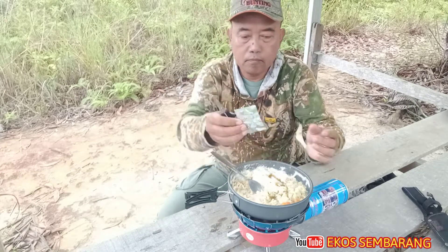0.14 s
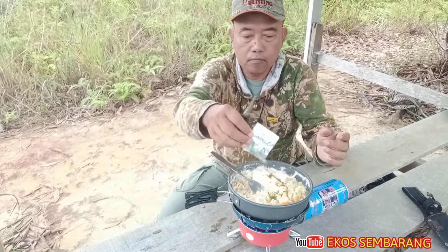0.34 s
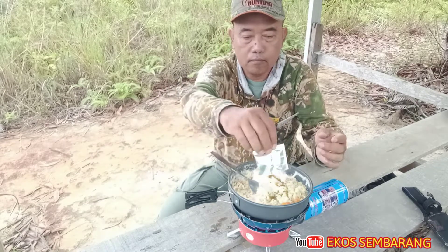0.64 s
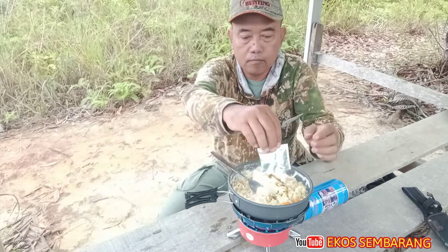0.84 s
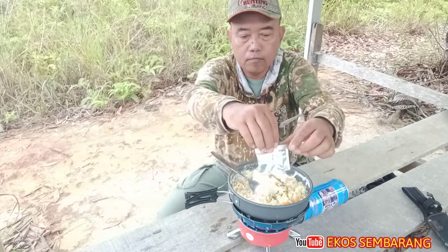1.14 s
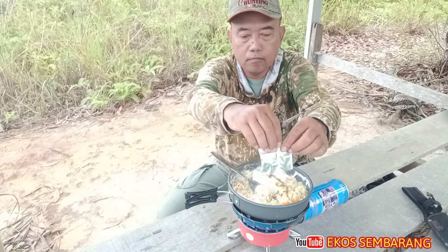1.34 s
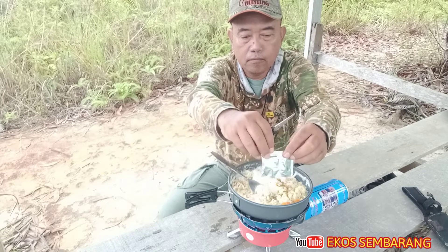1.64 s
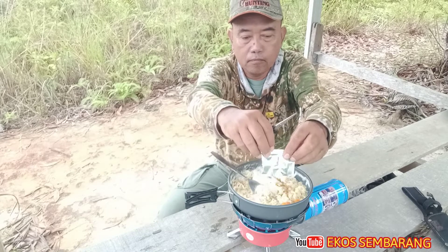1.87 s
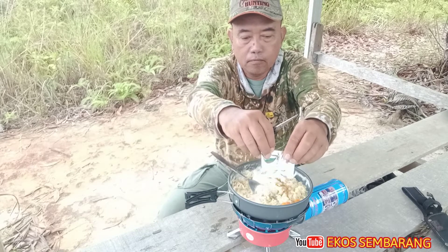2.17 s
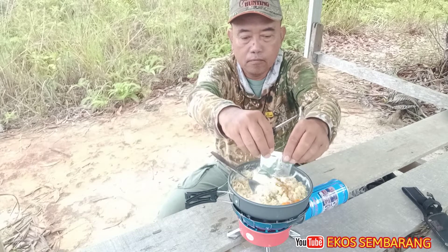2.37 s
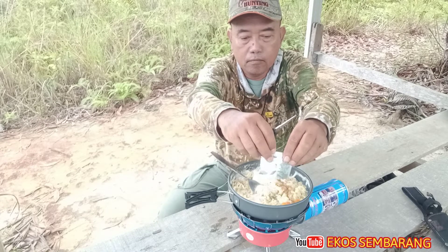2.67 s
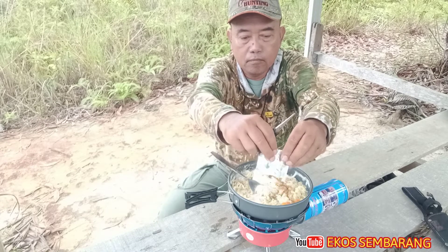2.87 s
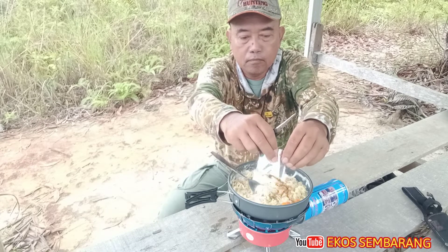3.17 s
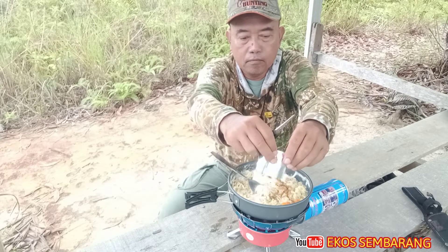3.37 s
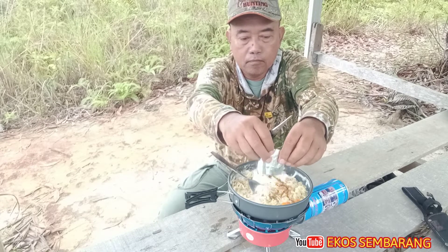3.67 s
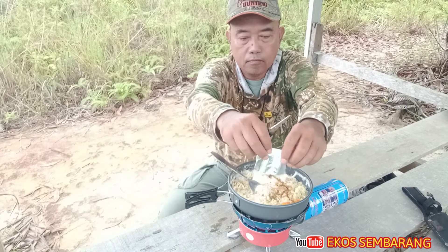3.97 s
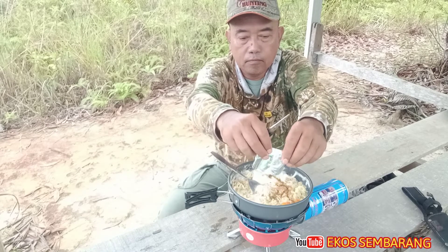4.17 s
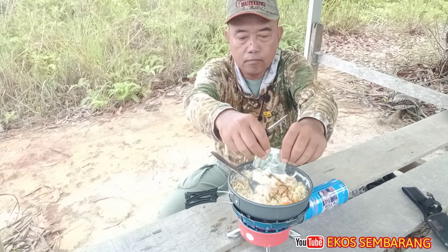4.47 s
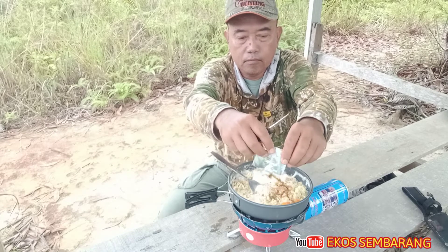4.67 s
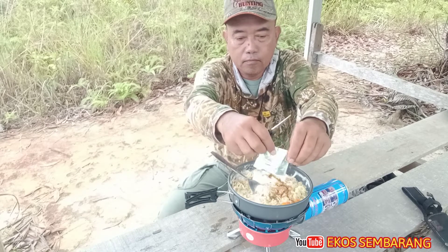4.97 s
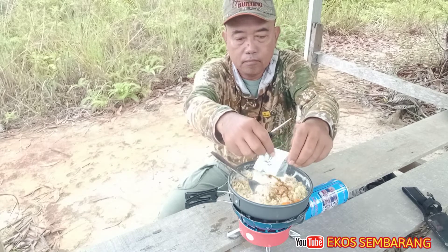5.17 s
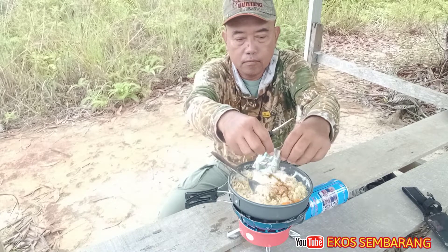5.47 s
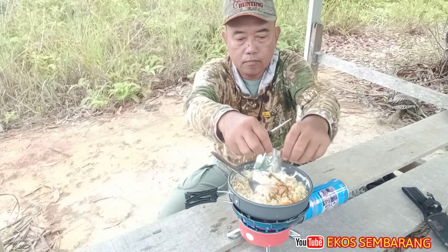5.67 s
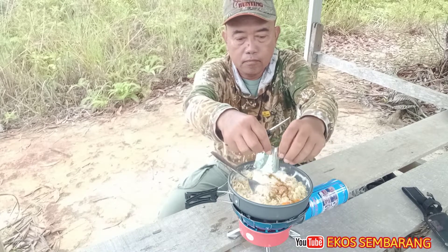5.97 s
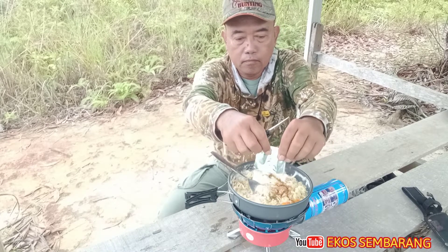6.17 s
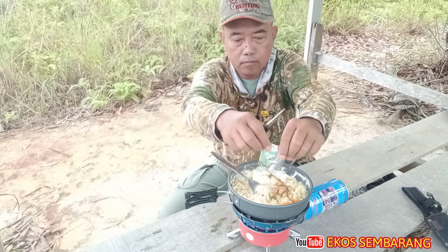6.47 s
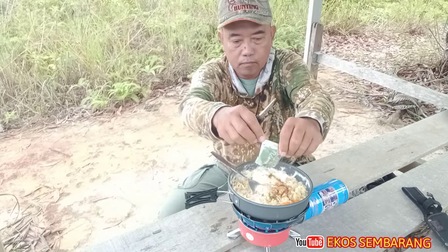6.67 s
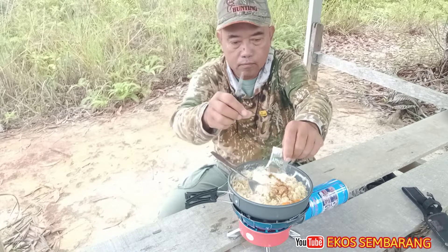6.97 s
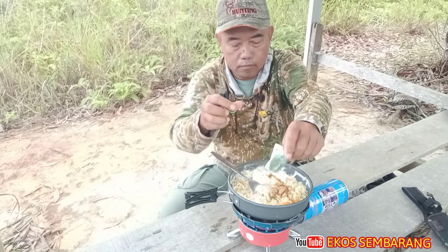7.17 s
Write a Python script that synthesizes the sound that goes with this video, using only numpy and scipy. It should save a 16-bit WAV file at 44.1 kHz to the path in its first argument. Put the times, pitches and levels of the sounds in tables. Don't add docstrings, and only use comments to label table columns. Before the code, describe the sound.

A close camera microphone catches stiff plastic film being worked by fingers: sparse clicks at first, then dense crackles, sharp snaps and hollow dents, plus soft thuds on bench and pan. High, pulsing crickets dominate the open grassy place throughout. Bird whistles echo behind them, another bird gives a few faint falling notes, a far insect hisses briefly, and a distant motor puffs quietly beneath the breeze.

```python
import sys
import numpy as np
from scipy import signal
from scipy.fft import rfft, irfft, next_fast_len
from scipy.io import wavfile
from scipy.ndimage import uniform_filter1d, map_coordinates

SR = 44100
rng = np.random.default_rng(int(sys.argv[2]) if len(sys.argv) > 2 else 0)


def wrap_up_sound(samples):
    columns = np.atleast_2d(samples).T
    tamed = np.clip(columns, -1, 1)
    steps = np.round(tamed * 32767).astype(np.int16)
    wavfile.write(sys.argv[1], SR, steps)


def gain_from_decibels(decibels):
    exponent = np.asarray(decibels, float) / 20
    return 10 ** exponent


N = 322371


def unit(x):
    return x / np.sqrt(np.mean(x ** 2) + 1e-20)


def curves(rows):
    s, *columns = np.transpose(rows)
    return [np.interp(np.arange(N) / SR, s, column) for column in columns]


def wobble(rate):
    knots = rng.standard_normal(int(N * rate / SR) + 4)
    return map_coordinates(knots, [np.arange(N) * rate / SR])


def filtered(x, response):
    m = next_fast_len(N + SR // 2)
    return irfft(rfft(x, m) * response(np.fft.rfftfreq(m, 1 / SR)), m)[..., :N]


def coloured(x, points):
    f, db = np.transpose(points)
    return filtered(x, lambda hz: gain_from_decibels(np.interp(np.log(hz + 1), np.log(f), db, -120, -120)))


def band(hz, centre_hz, width_hz):
    return 1j * hz * width_hz / (centre_hz ** 2 - hz ** 2 + 1j * hz * width_hz)


def placed(times, rows):
    at = np.round(times * SR).astype(int)[:, None] + np.arange(rows.shape[1])
    inside = (at >= 0) & (at < N)
    return np.bincount(at[inside], rows[inside], N)


def moments(cycles, place):
    whole = np.arange(np.floor(cycles[0]) - 1, cycles[-1]) + place
    return np.interp(whole, cycles, np.arange(N) / SR, -1, 99)


def echoes(x, t60, delay):
    out, step, t = np.zeros(N + 2 * SR), SR // 4, np.arange(SR) / SR
    for start in range(0, N, step):
        tail = rng.standard_normal(SR) * gain_from_decibels(-60 * t / t60) * (1 - np.exp(-t / delay))
        wet = signal.fftconvolve(x[start:start + step], tail / np.linalg.norm(tail))
        out[start:start + len(wet)] += wet
    return out[:N]


def creases(times, db, pitch_hz, cycles):
    t = np.arange(260) / SR
    hz = np.clip(pitch_hz, 300, 15000)[:, None]
    ring = np.exp(-t * hz / cycles) * np.sin(2 * np.pi * hz * t)
    return placed(times, gain_from_decibels(db)[:, None] * ring)


# (frequency [Hz], level per Hz [dB])
AIR_COLOUR = [(30, -25), (80, -7), (150, 1.5), (230, -9), (330, -22.5), (600, -24.5), (950, -15),
              (1500, -23), (2500, -24), (4000, -27), (5500, -38), (9000, -38), (16000, -43)]


def air():
    spectrum = signal.stft(rng.standard_normal(N + SR), nperseg=512)[2]
    across_pitch = uniform_filter1d(rng.standard_normal(spectrum.shape), size=6, axis=0)
    patches = uniform_filter1d(across_pitch, size=16, axis=1)
    drifting = signal.istft(spectrum * gain_from_decibels(4.55 * unit(patches)), nperseg=512)[1][:N]
    return gain_from_decibels(-56.5) * unit(coloured(drifting, AIR_COLOUR))


# (time [s], first cricket [cycles], second cricket [cycles], engine [cycles])
RHYTHM_LEAD = [(0.0, 0.071, -1.425, 0.036), (0.665, 0.14, -0.409, -0.011), (1.2, 0.19, -0.2, -0.028),
               (1.661, 0.212, -0.14, -0.013), (2.326, 0.178, 0.02, -0.007), (2.658, 0.189, 0.01, -0.015),
               (3.25, 0.212, 0.135, -0.028), (3.987, 0.155, 0.216, -0.06), (4.75, 0.108, 0.17, -0.036),
               (5.316, 0.105, 0.092, -0.024), (5.649, 0.068, -0.016, -0.006), (6.645, 0.088, -0.4, 0.047),
               (7.31, 0.135, -0.707, 0.095)]
EXHAUST_PUFFS = [
    (.026, 1.06),
    (.081, .78),
    (.435, 1.26),
    (.553, .22),
    (.749, .86),
]
# (centre [Hz], width [Hz], level [dB])
EXHAUST_PIPE = [
    (95, 37, 0),
    (143.3, 4.1, 0),
]


def engine():
    rate_hz = 9.62
    cycles = rate_hz * np.arange(N) / SR + curves(RHYTHM_LEAD)[2]
    puffs = np.zeros(N)
    for place, size in EXHAUST_PUFFS:
        times = moments(cycles, place)
        puffs += placed(times, size * gain_from_decibels(.9 * rng.standard_normal((len(times), 1))))

    def pipe(f):
        low_edge = (1j * f / 70) ** 2 / (1 + 1j * f / 70) ** 2 / np.sqrt(1 + (62 / (f + 1)) ** 4)
        high_edge = 1 / (1 + 1j * f / 220) ** 2 / np.sqrt(1 + (f / 215) ** 10)
        return low_edge * high_edge * sum(gain_from_decibels(db) * band(f, hz, width) for hz, width, db in EXHAUST_PIPE)

    drone = -filtered(puffs, pipe)
    since = (cycles - .16) % 1 / rate_hz
    strike = (gain_from_decibels(-60 * since / .07) + .2) * rng.standard_normal(N)
    knock = filtered(strike, lambda f: band(f, 977, 205) ** 2 + 0.36 * band(f, 1100, 390) ** 2)
    falling_tone = np.sin(2 * np.pi * (1000 - 900 * since) * since)
    ring = gain_from_decibels(-60 * since / .09 + 2.5 * wobble(25)) * falling_tone
    ring *= np.minimum(since / 0.0065, 1)
    return gain_from_decibels(-50.0) * unit(drone) + gain_from_decibels(-67.0) * unit(knock) + gain_from_decibels(-72.5) * unit(ring)


# (time [s], start pitch [Hz], end pitch [Hz], level [dB])
FAR_NOTES = [
    (1.92, 2630, 2150, -57.5),
    (2.15, 2590, 2360, -58.5),
    (2.23, 2420, 2130, -58),
    (3.379, 2550, 2400, -56.5),
]


def far_bird():
    times, start_hz, end_hz, db = (column[:, None] for column in np.transpose(FAR_NOTES))
    u = np.linspace(0, 1, round(0.037 * SR))
    phase = 2 * np.pi * np.cumsum(start_hz + (end_hz - start_hz) * u, axis=1) / SR
    direct = placed(times[:, 0], gain_from_decibels(db) * np.sin(np.pi * u) * np.sin(phase))
    return direct + gain_from_decibels(-9) * echoes(direct, t60=.2, delay=.01)


# (middle [s], half length [s], level [dB])
HISS_BOUTS = [
    (1.15, 0.43, -60),
    (2.107, 0.17, -58.5),
    (5.952, 0.33, -63),
]


def far_hiss():
    edge_db = 14.5
    noise = filtered(rng.standard_normal(N), lambda f: band(f, 4440, 700) ** 2)
    t = np.arange(N) / SR
    bouts = sum(gain_from_decibels(db - edge_db * ((t - middle) / half) ** 2) for middle, half, db in HISS_BOUTS)
    return bouts * gain_from_decibels(1.4 * wobble(24)) * unit(noise)


# (time from flick [s], pitch [Hz], level [dB])
WHISTLE_SHAPE = [
    (-.14, 3370, -32),
    (-.1, 3400, -15),
    (-.05, 3440, -5),
    (-.02, 3480, -3),
    (0, 3600, 0),
    (.014, 3900, -4),
    (.032, 4600, -9),
    (.045, 4780, -24),
]
# (flick time [s], level [dB])
WHISTLES = [
    (.876, -46),
    (1.32, -46.5),
    (1.725, -45.5),
    (2.472, -45),
    (2.935, -45.5),
    (3.59, -45),
    (3.975, -50),
    (5.65, -46.5),
    (6.198, -44.5),
]


def bird():
    t = np.arange(-.14, .045, 1 / SR)
    s, hz, db = np.transpose(WHISTLE_SHAPE)
    times, level_db = np.transpose(WHISTLES)
    note = gain_from_decibels(np.interp(t, s, db)) * np.sin(2 * np.pi * np.cumsum(np.interp(t, s, hz)) / SR)
    direct = placed(times + t[0], gain_from_decibels(level_db)[:, None] * note) * gain_from_decibels(2.5 * wobble(80))
    bright = filtered(direct, lambda f: 1 / np.sqrt(1 + (3650 / (f + 1)) ** 40))
    tail = gain_from_decibels(3) * echoes(bright, t60=.45, delay=.008) + gain_from_decibels(-2) * echoes(bright, t60=1.5, delay=.05)
    return gain_from_decibels(-1.5) * direct + gain_from_decibels(-5) * echoes(direct, t60=.1, delay=.003) + tail


# (place in cycle [0-1], level [dB], length [s])
WING_STROKES = [
    (0.196, -19.5, .008),
    (0.546, -6, .008),
    (0.774, 0, .0085),
    (1.015, -0.5, .008),
]


def cricket(cycles, top_hz, fall, octave_db, jitter, scatter_db):
    out, t = np.zeros(N), np.arange(700) / SR
    for place, db, length in WING_STROKES:
        times = moments(cycles, place)
        chance = rng.standard_normal((len(times), 5))
        u = np.clip(t / (length * (1 + 0.15 * chance[:, :1])), 0, 1)
        drop = fall * (u ** 4 - 0.0354 * db)
        hz = top_hz * (1 + 0.0031 * chance[:, 1:2] - drop)
        phase = 2 * np.pi * np.cumsum(hz, axis=1) / SR + 3 * chance[:, 2:3]
        octave = gain_from_decibels(octave_db) * np.sin(2 * phase) / np.sqrt(1 + (drop / 0.013) ** 2)
        swell = gain_from_decibels(db + scatter_db * chance[:, 3:4]) * np.sin(np.pi * u) ** 1.3
        out += placed(times - length / 2 + jitter * chance[:, 4], swell * (np.sin(phase) + octave))
    return unit(out)


# (frequency [Hz], level per Hz [dB])
CHORUS_COLOUR = [(4500, -44.5), (5600, -24), (6200, -3.5), (6650, -6), (7150, 2.5), (7600, -13),
                 (9000, -31), (11400, -46), (12300, -23), (13800, -20.5), (14600, -8), (15100, -34),
                 (15700, -21), (16500, -32)]


def far_chorus():
    t = np.arange(N) / SR
    others = np.zeros(N)
    for rate_hz, wing_hz in [(17.1, 7150), (18.1, 6900), (16.0, 6550), (16.6, 7250)]:
        cycles = rate_hz * t + rng.random() + .3 * wobble(.4)
        others += gain_from_decibels(1.1 * wobble(0.69)) * cricket(cycles, wing_hz, 0.063, -15, .001, 1.7)
    blur = unit(coloured(rng.standard_normal(N), CHORUS_COLOUR)) * gain_from_decibels(1.1 * wobble(9))
    return gain_from_decibels(-4.5) * unit(echoes(others, t60=0.1, delay=0.001)) + gain_from_decibels(-3.5) * blur


# (time [s], first cricket [dB], second cricket [dB], far chorus [dB])
SONG_LEVELS = [(0, -41.5, -38, -37.5), (.6, -42.5, -37, -37), (1.2, -40, -33.5, -36.5),
               (2, -42, -33, -35.5), (2.8, -40, -33, -35.5), (3.6, -42, -31.5, -35.5),
               (4.4, -39, -32.5, -35), (5.2, -40.5, -31, -34.5), (6, -39.5, -34, -34.5),
               (6.7, -41, -32.5, -34.5), (7.31, -39, -32, -36)]


def insects():
    t = np.arange(N) / SR
    first_lead, second_lead, _ = curves(RHYTHM_LEAD)
    first_db, second_db, far_db = curves(SONG_LEVELS)
    first = cricket(17.66 * t + first_lead, top_hz=7355, fall=0.11, octave_db=0.0,
                    jitter=.0005, scatter_db=1.5)
    file = filtered(rng.standard_normal(N),
                    lambda f: band(f, 15500, 900) ** 2 + .15 * band(f, 8300, 1200) ** 2)
    scrape = file * uniform_filter1d(np.abs(first), size=60)
    first = first + gain_from_decibels(-13.0) * unit(scrape)
    second = cricket(18.6 * t + second_lead - .2, top_hz=6769, fall=0.062, octave_db=-24,
                     jitter=0.00089, scatter_db=1.5)
    near = gain_from_decibels(first_db + 4.0) * first + gain_from_decibels(second_db - 5.5) * second
    return near + gain_from_decibels(-10.5) * echoes(near, t60=0.042, delay=0.0011) + gain_from_decibels(far_db) * far_chorus()


# (time [s], peak level [dB])
KNOCKS = [(2.025, -46), (2.99, -60), (3.22, -46), (3.428, -56), (3.799, -45.5), (4.13, -45), (4.915, -44),
          (5.534, -39.5), (5.81, -46), (6.004, -34), (6.065, -65), (6.359, -47)]


def thumps():
    times, db = np.transpose(KNOCKS)
    t = np.arange(2000) / SR
    rows = gain_from_decibels(db[:, None] - 60 * t / 0.063) * rng.standard_normal((len(times), len(t)))
    return gain_from_decibels(9) * filtered(placed(times, rows), lambda f: band(f, 484, 940) ** 2)


# (time [s], peak level [dB])
FILM_TICKS = [(0.7218, -46), (2.1154, -41), (2.603, -48), (4.358, -37), (4.3734, -47), (4.396, -41),
              (4.5266, -53), (4.616, -40), (4.6847, -56), (4.7086, -43), (4.7232, -38.5), (4.8227, -47),
              (5.69, -41), (5.919, -41), (6.031, -41), (6.0998, -37), (6.3444, -48), (6.708, -35),
              (6.8216, -48), (6.9783, -39), (7.1788, -47)]


def ticks():
    times, db = np.transpose(FILM_TICKS)
    chance = rng.standard_normal((len(times), 9, 3))
    when = times[:, None] + 0.0055 * np.abs(chance[..., 0])
    level_db = db[:, None] - 11 + 2.7 * chance[..., 1]
    pitch_hz = 3000 * np.exp(0.427 * chance[..., 2])
    return creases(when.ravel(), level_db.ravel(), pitch_hz.ravel(), cycles=3.3)


# (time [s], level [dB])
FOLD_SNAPS = [(2.914, -37), (2.987, -33.5), (3.094, -37), (3.16, -35), (3.169, -34.5), (3.221, -29),
              (3.431, -28), (3.488, -34.5), (3.892, -31.5), (3.984, -32.5), (4.132, -29), (4.739, -37),
              (5.13, -38), (5.187, -44), (5.323, -36), (5.538, -27.5), (5.814, -36), (6.006, -29),
              (6.12, -38.5), (6.297, -38.5), (6.497, -31.5), (6.771, -33), (6.864, -29)]
# (time [s], level [dB])
POUCH_DENTS = [(1.683, -36.5), (2.029, -36), (3.211, -39), (3.568, -31), (3.757, -30.5), (3.813, -34.5),
               (3.884, -33), (3.912, -30), (4.043, -27), (4.463, -33), (4.644, -36.5), (4.851, -37),
               (4.934, -34), (5.458, -32.5), (5.614, -44), (5.715, -33.5), (6.361, -43), (6.414, -41),
               (6.613, -35), (6.9395, -20), (7.025, -34), (7.063, -30), (7.071, -32), (7.179, -41),
               (7.206, -41)]
# (time [s], level [dB])
CREASE_POPS = [(1.287, -33), (1.431, -36), (1.677, -35), (1.702, -32.5), (2.351, -43), (2.668, -37.5),
               (2.785, -35), (2.795, -33), (3.066, -28.5), (3.299, -29.5), (3.44, -27), (3.662, -32),
               (3.705, -35), (3.749, -29), (3.798, -35.5), (4.065, -34), (4.093, -32), (4.487, -40),
               (4.868, -40), (4.903, -34), (4.916, -33.5), (5.023, -40), (5.338, -36), (5.404, -31.5),
               (5.687, -37), (6.317, -33), (6.372, -25.5), (6.856, -36), (6.945, -24.5), (7.254, -37)]
# (time [s], level [dB])
EDGE_CRACKS = [(2.054, -26), (2.675, -40), (2.816, -32.5), (2.835, -34), (2.903, -35.5), (2.994, -32),
               (3.003, -34), (3.111, -34.5), (3.33, -39), (3.472, -37), (3.739, -38), (3.906, -28.5),
               (4.754, -29), (5.058, -39), (5.254, -32), (5.496, -42), (5.578, -41), (6.425, -26.5),
               (6.583, -41), (6.76, -38), (6.885, -39)]
# (low band [dB], middle band [dB], high band [dB])
SNAP_COLOURS = [
    (-4, -1, -5),
    (-4, -0.5, -37),
    (-14.5, -1, -39),
    (-14.5, -8, 0),
]
# (start [s], length [s], level [dB])
FINGER_SQUEEZES = [(2.33, 0.033, -49), (2.496, .12, -53), (2.685, 0.032, -58), (2.79, 0.23, -45),
                   (3.062, 0.26, -49), (3.458, 0.17, -50), (3.647, 0.29, -46), (3.967, 0.17, -46),
                   (4.219, 0.083, -63), (4.351, 0.059, -51), (4.437, .13, -54.5), (4.609, 0.11, -51.5),
                   (4.72, 0.1, -44.5), (4.849, 0.095, -38), (5.022, .05, -54), (5.129, 0.13, -45.5),
                   (5.309, .16, -41.5), (5.497, .13, -43), (5.689, 0.2, -43), (6, .13, -55),
                   (6.269, .17, -45), (6.471, .16, -46.5), (6.755, 0.072, -48), (6.86, 0.12, -46),
                   (7.171, 0.095, -50)]
# (low band [dB], middle band [dB], high band [dB])
CRACKLE_COLOUR = (-6.5, 0, -5)


def film_events():
    snap_scatter_db, crackle_scatter_db, crackles_per_s = 1, 3, 50
    snaps = []
    for rows, colour in zip((FOLD_SNAPS, POUCH_DENTS, CREASE_POPS, EDGE_CRACKS), SNAP_COLOURS):
        snaps += [(s, *(db + np.array(colour))) for s, db in rows]
    snaps = np.array(snaps)
    snaps[:, 1:] += snap_scatter_db * rng.standard_normal((len(snaps), 3))
    start, length, db = (column[:, None] for column in np.transpose(FINGER_SQUEEZES))
    times = start + length * rng.random((len(start), 24))
    scatter = crackle_scatter_db * rng.standard_normal((len(start), 24, 3))
    levels = db[..., None] + np.array(CRACKLE_COLOUR) + scatter
    sounding = np.arange(24) < crackles_per_s * length
    crackles = np.column_stack([times[sounding], levels[sounding]])
    return np.vstack([snaps, crackles]).T


# (frequency [Hz], level [dB])
FILM_COLOUR = [(300, -12), (700, -19.5), (1200, 1.5), (2000, -7), (3800, 7), (5500, -7), (9000, 8),
               (12000, -25), (16000, -35)]


def rustle():
    chance = rng.standard_normal((6000, 2))
    pitch_hz = 3200 * np.exp(0.776 * chance[:, 1])
    fine = creases(rng.random(6000) * N / SR, 4 * chance[:, 0], pitch_hz, cycles=3.2)
    fine = unit(fine) + .5 * rng.standard_normal(N)
    return unit(coloured(fine, FILM_COLOUR) * gain_from_decibels(3 * wobble(50)))


def sachets():
    times, low_db, mid_db, high_db = film_events()
    t = np.arange(1500) / SR
    decay = gain_from_decibels(-60 * t / .005) + .14 * gain_from_decibels(-60 * t / .05)
    burst = rng.standard_normal((len(times), len(t))) * decay
    burst /= np.sqrt(np.mean(burst[:, :40] ** 2, axis=1, keepdims=True))
    low, mid, high = (placed(times, gain_from_decibels(db)[:, None] * burst) for db in (low_db, mid_db, high_db))
    snaps = gain_from_decibels(13) * filtered(low, lambda f: band(f, 1540, 710) ** 2)
    snaps += gain_from_decibels(8.0) * filtered(mid, lambda f: band(f, 4300, 4940) ** 2)
    snaps += gain_from_decibels(3.5) * filtered(high, lambda f: band(f, 9500, 11000) ** 2)
    chance = rng.standard_normal((len(times), 5, 3))
    after = times[:, None] + .006 + .009 * chance[..., 0]
    train_db = mid_db[:, None] - 15.0 + 0.79 * chance[..., 1]
    train_hz = 3000 * np.exp(0.61 * chance[..., 2])
    train = creases(after.ravel(), train_db.ravel(), train_hz.ravel(), cycles=3.9)
    motion = placed(times - .015, np.sqrt(gain_from_decibels(mid_db))[:, None] * np.hanning(round(.05 * SR)))
    return snaps + train + gain_from_decibels(-44.5) * motion ** 0.73 * rustle()


def scene():
    background = air() + engine() + far_bird() + far_hiss() + bird()
    return (background + insects() + thumps() + ticks() + sachets())[None]


def low_pass(x):
    return signal.sosfilt(signal.butter(12, 16680, fs=SR, output="sos"), x)


def record(dry):
    top_hz = 15850
    mix = filtered(dry, lambda hz: hz < top_hz)
    return low_pass(mix)


dry = scene()
out = record(dry)
wrap_up_sound(out)
```